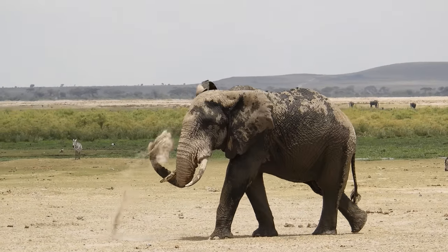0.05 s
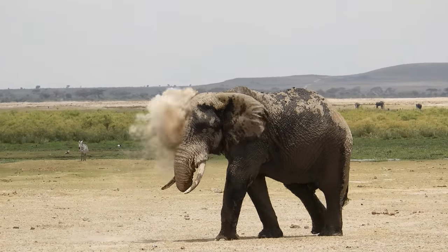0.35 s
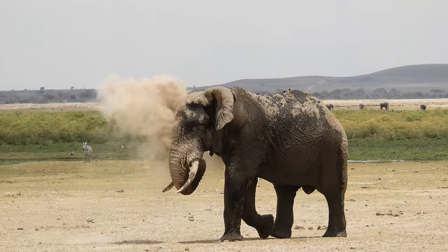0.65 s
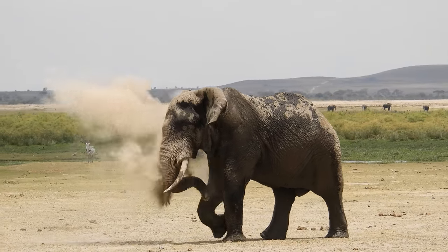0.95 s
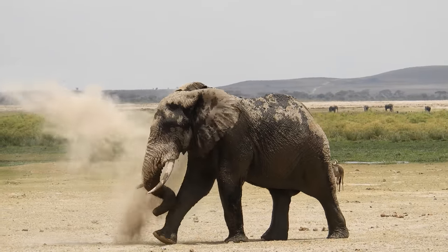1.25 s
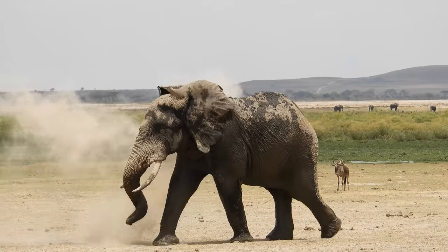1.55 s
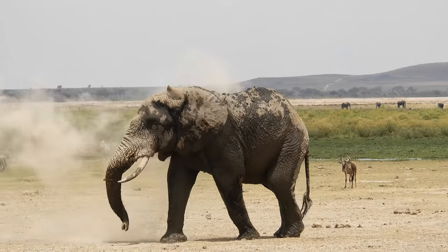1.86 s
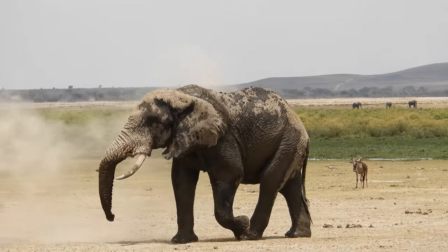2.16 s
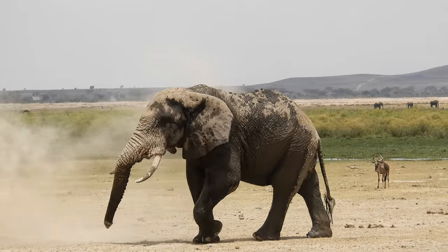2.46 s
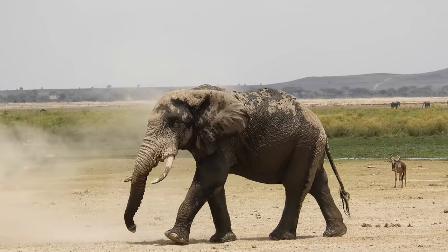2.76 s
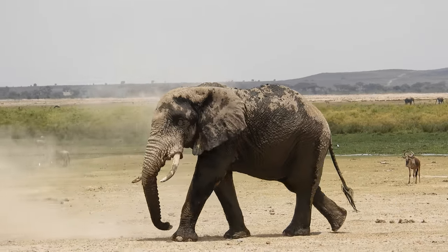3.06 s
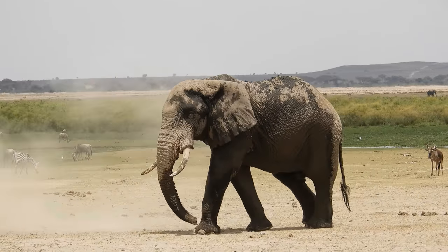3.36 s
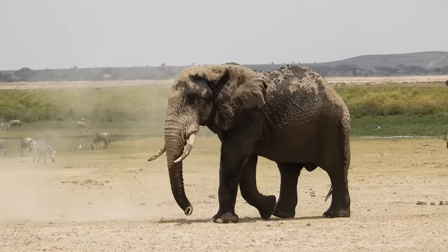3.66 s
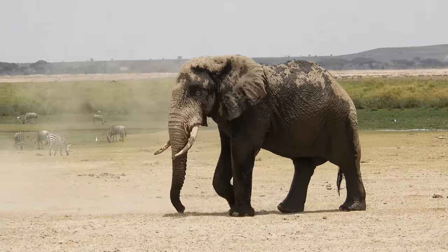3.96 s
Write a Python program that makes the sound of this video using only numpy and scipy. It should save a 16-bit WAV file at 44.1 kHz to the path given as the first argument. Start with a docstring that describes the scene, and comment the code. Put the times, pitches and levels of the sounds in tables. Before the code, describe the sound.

Two brief, gritty puffs hiss from an elephant's trunk on an open plain, and grit sifts softly down. Wind flutters and thumps on the microphone throughout, later swelling into low surges, with faint ticks and a thin hiss.

```python
"""On an open plain, an elephant blows two hissing puffs of dust from its trunk.
Air lingering in the trunk rings faintly, and grit rustles down after the puffs.
Gusty wind rumbles, flutters and thumps on the microphone's two openings (ports), each in its own way,
and peaks in low surges near three seconds. Faint regular ticks ride on it, over a thin steady hiss."""
import sys
import numpy as np
from scipy import signal
from scipy.fft import rfft, irfft
from scipy.io import wavfile
from scipy.ndimage import uniform_filter1d, minimum_filter1d

SR = 44100
rng = np.random.default_rng(int(sys.argv[2]) if len(sys.argv) > 2 else 0)


def to_wav(s):
    """Save 16-bit WAV."""
    ch = np.atleast_2d(s).T  # columns
    pcm = np.round(np.clip(ch, -1, 1) * 32767)  # PCM
    wavfile.write(sys.argv[1], SR, pcm.astype(np.int16))


N = 176400  # 4 seconds

# The two puffs: (start [s], length [s], hiss level [dB], hollow part's level [dB])
PUFFS = [(0.716, 0.093, -27, -37.5), (1.693, 0.082, -28, -36)]
# Spurts of grit inside the puffs: (time [s], level [dB])
SPURTS = [(0.726, -21), (0.737, -14), (.761, -13), (0.795, -14.5), (1.705, -17), (1.728, -13.5)]
# Tone colour (how strong lows and highs are) of the hiss and the hollow part: (frequency [Hz], level [dB])
DUST_COLOUR = [(1700, -30), (3200, -11.5), (5300, -4), (5900, 2), (6650, -2), (9700, -1), (10500, -12.5),
               (12500, -20), (15500, -51)]
HOLLOW_COLOUR = [(300, -6), (1100, -2.5), (1650, -0.5), (1990, 0), (2170, 4.5), (2320, -24), (2450, 2.5),
                 (2900, 2), (3100, -27), (3400, 2), (6000, -26)]
def puffs():
    """Air and grit rush out of the trunk: a grainy hiss with sharp spurts and a hollow lower part."""
    rush = sum(swell(start, length, db, fall_s=0.01) for start, length, db, _ in PUFFS)
    hollow = sum(swell(start, length, db, fall_s=0.01) for start, length, _, db in PUFFS)
    flicker = grains()
    dust = from_plain(np.hypot(rush, spikes(SPURTS)) * flicker, DUST_COLOUR)
    return dust + from_plain(hollow * flicker, HOLLOW_COLOUR)


# Hollow rings after the first puff: (start [s], length [s], level [dB])
RINGS = [(0.823, 0.055, -56), (1.053, 0.057, -54.5)]
def trunk_rings(pitch_hz=1870, width_hz=120):
    """Air lingering in the trunk rings faintly around one pitch."""
    flow = sum(swell(*row) for row in RINGS)
    return flow * unit(band(noise(), pitch_hz - width_hz / 2, pitch_hz + width_hz / 2))


# Soft rustles of grit: (start [s], length [s], level [dB])
RUSTLES = [(0.791, 0.16, -49.5), (0.98, 0.33, -56.5), (1.094, 0.012, -47), (1.505, 0.026, -49.5),
           (1.582, 0.011, -45.5), (2.159, 0.43, -53), (2.917, 0.046, -46.5)]
# Sharp ticks of grit: (time [s], level [dB])
GRIT_TICKS = [(2.411, -38), (2.933, -27)]
# Tone colours of the rustles and the swish: (frequency [Hz], level [dB])
RUSTLE_COLOUR = [(700, -4), (2060, 1), (2480, -1.5), (4800, -4.5), (5250, 1.5), (5700, -3), (7600, 0),
                 (9800, -2), (12500, -30)]
SWISH_COLOUR = [(3700, -1), (4500, 5.5), (6500, -6), (7500, -19)]
def falling_grit():
    """Grit sifts down in soft rustles, with two sharp ticks and one swish."""
    sifting = sum(swell(*row) for row in RUSTLES)
    rustles = from_plain(sifting * grains(), RUSTLE_COLOUR)
    ticks = from_plain(spikes(GRIT_TICKS), DUST_COLOUR)
    swish = from_plain(swell(start=2.16, length=0.012, db=-47, fall_s=0.2), SWISH_COLOUR)
    return rustles + ticks + swish


def grains(depth_db=4.5, rate_hz=507):
    """Many tiny grains of grit make the loudness flicker quickly."""
    return unit(amp(depth_db * wander(rate_hz, limit=1)))


# How alike the two ports hear the plain: (frequency [Hz], likeness [0 to 1])
LIKENESS = [(2000, 0.68), (4000, 0.23), (6200, 0.89), (12000, 0.2)]
# How far the wave at the left port is ahead: (frequency [Hz], lead [radians])
LEFT_LEAD = [(3000, 0.11), (5000, 0.99), (7000, 1.32), (13000, 1.77)]
def from_plain(loudness, tone):
    """Noise that follows a loudness curve, scattered on its way to both ports."""
    alike = np.clip(per_frequency(LIKENESS), 0, 1)
    left, unrelated = (rfft(colour(noise() * loudness, tone)) for _ in range(2))
    right = alike * left + np.sqrt(1 - alike ** 2) * unrelated
    lag = np.exp(-1j * per_frequency(LEFT_LEAD))
    return irfft(echo_ripple() * np.array([left, right * lag]), N)


def echo_ripple(depth_db=3.5, echo_s=0.005):
    """Short echoes strengthen some frequencies and weaken others, at random."""
    echoes = noise() * (times() < echo_s)
    hills = np.clip(unit(rfft(echoes).real), -2.5, 1.5)
    return unit(amp(depth_db * hills))


# Gusts at each port: (time [s], relative rumble level [dB], relative flutter level [dB])
WIND_LEFT = [(0.0, -34.5, -56), (0.28, -26.5, -55), (0.8, -27.5, -43.5), (0.86, -20.5, -30.5),
             (0.97, -25.5, -46), (1.19, -27.5, -36), (1.26, -30, -54), (1.35, -15.5, -28), (1.49, -36, -72),
             (1.68, -30, -60), (1.75, -32.5, -26), (1.87, -25, -68), (1.96, -22.5, -30.5),
             (2.14, -21.5, -36.5), (2.17, -34, -40.5), (2.32, -28, -44), (2.36, -15.5, -27.5),
             (2.41, -27.5, -38), (2.51, -35, -54), (2.55, -20, -30.5), (2.64, -34.5, -44), (2.68, -17, -25),
             (3.0, -18, -24), (3.11, -28, -27), (3.68, -21.5, -35.5), (3.71, -31.5, -58),
             (4.0, -25.5, -36.5)]
WIND_RIGHT = [(0.0, -31, -65.5), (0.24, -31, -33.5), (0.29, -27, -53), (0.46, -26, -37), (0.6, -28.5, -60),
              (0.666, -26, -25.5), (0.77, -30.5, -55), (0.836, -19, -20.5), (0.96, -25, -42),
              (1.055, -33, -30.5), (1.17, -25, -34), (1.29, -43, -55), (1.54, -55, -81), (1.6, -25, -21),
              (1.637, -30, -50.5), (1.74, -31.5, -30), (2.03, -20.5, -31), (2.169, -28.5, -24),
              (2.2, -33.5, -39.5), (2.27, -36, -27), (2.375, -15, -26.5), (2.414, -32, -24.5),
              (2.51, -37, -46), (2.539, -26, -24.5), (3.02, -18.5, -24.5), (3.08, -24, -24.5),
              (3.67, -24.5, -37.5), (3.71, -29.5, -45.5), (3.96, -26, -32.5)]
# Tone colours of the wind's low, middle and high layers: (frequency [Hz], level [dB])
RUMBLE_COLOUR = [(20, -89), (45, -24.5), (90, -18.5), (135, -1), (190, 1.5), (235, -14), (320, -20.5),
                 (680, -61.5)]
FLUTTER_COLOUR = [(130, -25.5), (230, 1), (320, 2), (460, -1), (740, -21.5), (1200, -50), (2500, -102)]
ROAR_COLOUR = [(300, -2), (560, 8), (780, 1.5), (1100, -10), (1450, -20.5), (3000, -38), (9000, -83)]
STRONG_DB, LUMP_HZ = -30, 24.3  # flutter level of a strong gust; how fast lumps of air pass
def wind(gusts):
    """Swirls of air on one port make a rumble and a flutter, plus spits of roar in strong gusts."""
    rumble_db, flutter_db = gust_levels(gusts, times())
    roar_db = STRONG_DB + 2.09 * (flutter_db - STRONG_DB)  # grows faster than the flutter
    swirls = wander(hz=70, limit=2)
    air = noise()
    spits = np.minimum(swirls + wander(hz=113), 3)
    rumble = amp(rumble_db + 0.5) * wind_layer(air, swirls, RUMBLE_COLOUR, flare_db=3)
    flutter = amp(flutter_db + 2) * wind_layer(air, swirls, FLUTTER_COLOUR, flare_db=6.5)
    roar = amp(roar_db - 8.5) * wind_layer(noise(), spits, ROAR_COLOUR, flare_db=6.5)
    lumps = unit(amp(2.5 * wander(LUMP_HZ, limit=2)))
    return (rumble + flutter + roar) * lumps


def wind_layer(air, swirls, tone, flare_db, bend_octaves=0.18):
    """Noise flares with each swirl, and each lump of air bends its pitch up or down."""
    flaring = colour(air * amp(flare_db * swirls), tone)
    speed = 2 ** (bend_octaves * wander(LUMP_HZ, limit=2))
    bent = np.interp(np.cumsum(speed) / speed.mean(), np.arange(N), flaring)
    slow_power = uniform_filter1d(uniform_filter1d(bent ** 2, size=3000), size=2000)
    return bent / np.sqrt(slow_power + 1e-12)  # evens out slow changes, keeps quick flares


def gust_levels(gusts, at):
    """The rumble and flutter levels at the given times."""
    when, rumble_db, flutter_db = np.transpose(gusts)
    return np.interp(at, when, rumble_db), np.interp(at, when, flutter_db)


# Single swirls that hit a port: (time [s], level [dB], pitch [Hz], left minus right [dB])
THUMPS = [(0.6646, -10.5, 470, -34), (0.8325, -2.5, 430, -38), (1.5996, 0, 345, -39), (1.748, -18, 526, -2),
          (2.149, -5.5, 450, -43), (2.264, -7, 433, -27), (2.299, -10.5, 500, -34), (2.312, -6, 363, -38),
          (2.399, -6.5, 450, -34), (2.644, -7.5, 486, -31), (2.667, -10.5, 730, -25), (2.701, -8, 560, -18),
          (2.838, -8.5, 404, 6), (2.878, -6, 330, 3), (2.969, -7, 540, -6.5), (3.241, -12, 510, -4.5),
          (3.535, -10.5, 600, -22)]
def wind_thumps(width_cycles=0.39, low_cut_hz=115):
    """Each strong swirl swings the air pressure back and forth just once or twice."""
    out = np.zeros((2, N))
    for when, db, hz, pan_db in THUMPS:
        cycles = np.clip((times() - when) * hz, -10, 10)
        port_gains = amp(db + np.minimum([[pan_db], [-pan_db]], 0))
        out += port_gains * np.cos(2 * np.pi * cycles) / np.cosh(cycles / width_cycles)
    return signal.sosfiltfilt(signal.butter(2, low_cut_hz, "high", fs=SR, output="sos"), out)


# Low surges of the big gust: (time [s], peak level [dB])
SURGES = [(2.697, -13), (2.767, -4.5), (2.855, -5.5), (2.945, -7), (2.976, -8), (3.014, -6), (3.224, -14),
          (3.278, -12.5), (3.343, -12.5), (3.417, -10.5), (3.575, -13), (3.662, -18.5)]
def wind_surges(width_s=0.013):
    """Big lumps of air wrap the whole microphone: low whumps, partly alike on both ports."""
    shared, separate = noise(), np.array([noise(), noise()])
    air = band(shared + 0.9 * separate, low_hz=174, high_hz=300)
    out = np.zeros((2, N))
    for when, db in SURGES:
        whump = air * np.exp(-((times() - when) / width_s) ** 2)
        out += amp(db) * whump / abs(whump).max(axis=1, keepdims=True)
    return out


# Flurries of louder ticks: (time [s], width [s], boost [dB])
TICK_FLURRIES = [(.365, 0.025, 10.5), (0.564, 0.031, 14.5), (1.91, 0.11, 8.5), (2.767, 0.046, 9.5),
                 (2.968, 0.027, 13.5), (3.545, 0.027, 9)]
# Tone colour of the ticks: (frequency [Hz], level [dB])
TICK_COLOUR = [(900, 3.5), (2000, -1.5), (4100, -7), (4600, -30), (8000, -60)]
def wind_ticks(gusts, gap_s=512 / 48000, spread_db=8):
    """Faint dull ticks of random size on a fast regular beat, louder in strong wind and in flurries."""
    beats = np.arange(gap_s, N / SR - gap_s, gap_s)
    size, sign = rng.standard_normal((len(beats), 2)).T
    _, flutter_db = gust_levels(gusts, beats)
    level_db = -28 + 0.37 * (flutter_db - STRONG_DB)
    level_db += sum(db * np.exp(-((beats - when) / width) ** 2) for when, width, db in TICK_FLURRIES)
    level_db += spread_db * np.minimum(size, 0.8)
    clicks = np.zeros(N)
    clicks[(beats * SR).astype(int)] = np.sign(sign) * amp(level_db)
    return colour(clicks, TICK_COLOUR)


# Tone colour of the background hiss: (frequency [Hz], level [dB])
HISS_COLOUR = [(900, 3), (2000, -3), (4500, 0), (11500, -7), (15000, -25)]
def hiss(gusts, level_db=-53.5):
    """Thin hiss on one port, which dips a little in strong gusts."""
    _, flutter_db = gust_levels(gusts, times())
    dip_db = 0.19 * np.maximum(flutter_db - STRONG_DB, 0)
    return amp(level_db - dip_db) * colour(noise(), HISS_COLOUR)


def swell(start, length, db, rise_s=0.011, fall_s=0.02):
    """A loudness curve that rises up to its start, holds, then fades."""
    age = times() - start
    return amp(db) * np.exp(np.minimum(age, 0) / rise_s - np.maximum(age - length, 0) / fall_s)


def spikes(rows, width_s=0.002):
    """A loudness curve of very brief bursts."""
    return sum(amp(db) * np.exp(-abs(times() - when) / width_s) for when, db in rows)


def wander(hz, limit=np.inf):
    """A random wobble up to about hz, of typical size 1, kept between -limit and +limit."""
    smooth = irfft(rfft(noise()) / (1 + (np.fft.rfftfreq(N, 1 / SR) / hz) ** 4), N)
    return np.clip(unit(smooth), -limit, limit)


def colour(x, tone):
    """Gives a sound a tone colour; white noise keeps its power."""
    return irfft(rfft(x) * unit(amp(per_frequency(tone))), N)


def per_frequency(points):
    """Joins a table's points to give a value at every frequency."""
    hz, value = np.transpose(points)
    return np.interp(np.log(np.fft.rfftfreq(N, 1 / SR) + 1), np.log(hz + 1), value)


def band(x, low_hz, high_hz):
    """Keeps the part of a sound between two frequencies."""
    return signal.sosfilt(signal.butter(2, [low_hz, high_hz], "band", fs=SR, output="sos"), x)


def amp(db):
    """Turns decibels into a multiplier."""
    return 10 ** (np.asarray(db) / 20)


def unit(x):
    """Scales to an average power of 1."""
    return x / np.sqrt(np.mean(x ** 2) + 1e-20)


def times():
    """The time of every sample, in seconds."""
    return np.arange(N) / SR


def noise():
    """White noise: all frequencies equally strong."""
    return rng.standard_normal(N)


def scene():
    """The elephant's dust out on the plain; wind, ticks and hiss at the two ports."""
    ports = np.array([wind(gusts) + wind_ticks(gusts) + hiss(gusts) for gusts in (WIND_LEFT, WIND_RIGHT)])
    return puffs() + trunk_rings() + falling_grit() + ports + wind_thumps() + wind_surges()


def record(dry, ceiling=0.98, top_hz=15750):
    """Briefly turns down any peak above the ceiling, then cuts the highest treble."""
    needed_gain = ceiling / np.maximum(abs(dry), ceiling)
    held_gain = minimum_filter1d(needed_gain, size=200, axis=1)
    smooth_gain = uniform_filter1d(held_gain, size=200, axis=1)
    treble_cut = signal.firwin(511, top_hz, window=("kaiser", 9), fs=SR)
    return signal.oaconvolve(dry * smooth_gain, treble_cut[None], "same")


dry = scene()
out = record(dry)
to_wav(out)
```